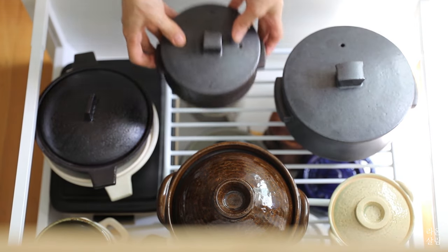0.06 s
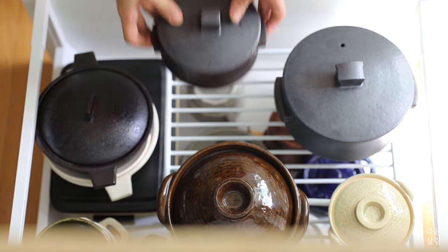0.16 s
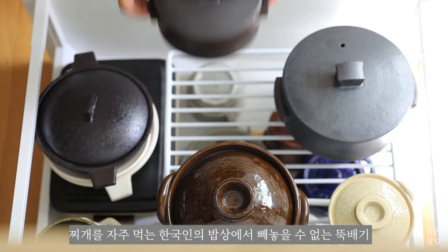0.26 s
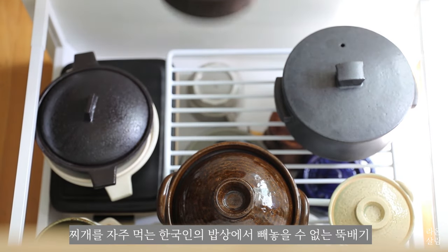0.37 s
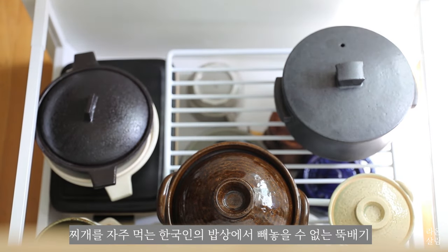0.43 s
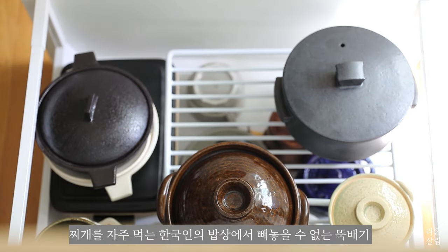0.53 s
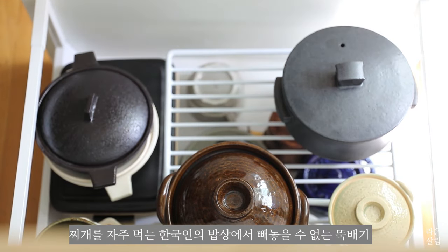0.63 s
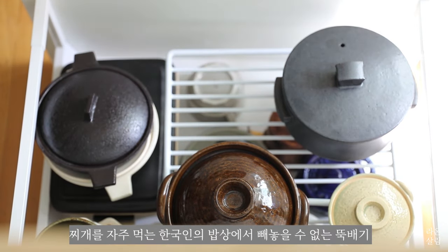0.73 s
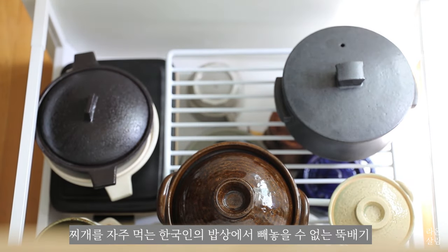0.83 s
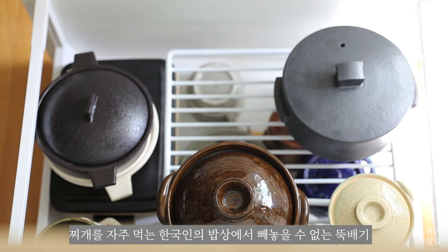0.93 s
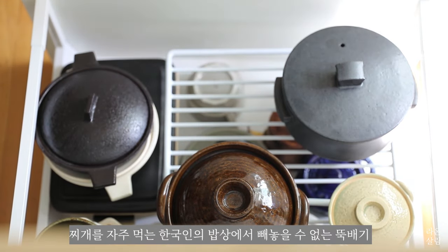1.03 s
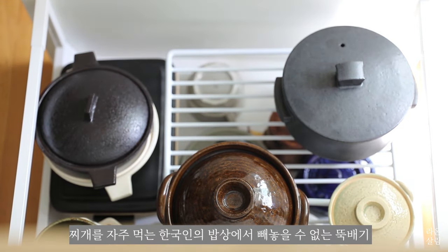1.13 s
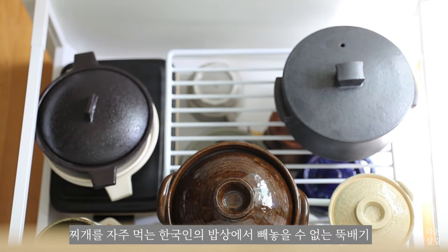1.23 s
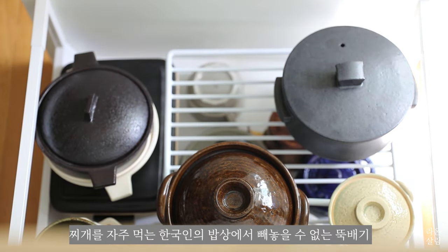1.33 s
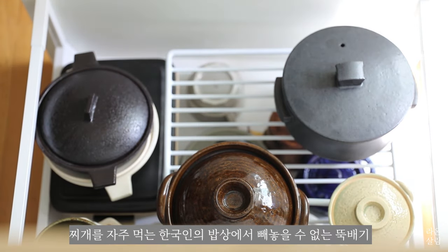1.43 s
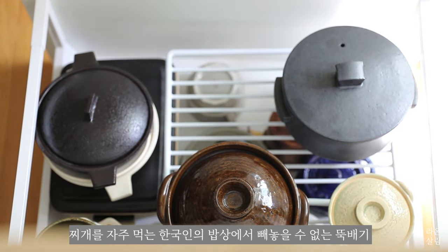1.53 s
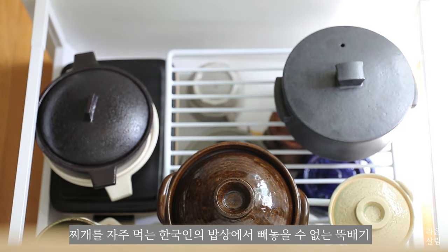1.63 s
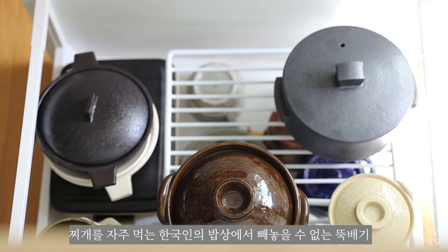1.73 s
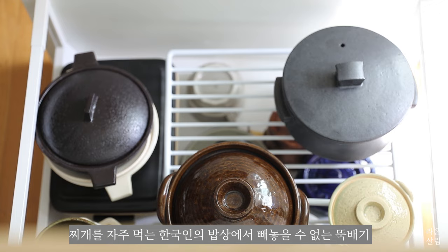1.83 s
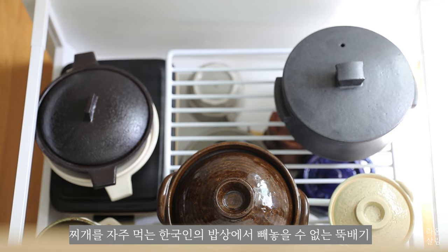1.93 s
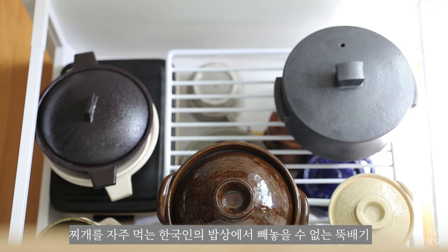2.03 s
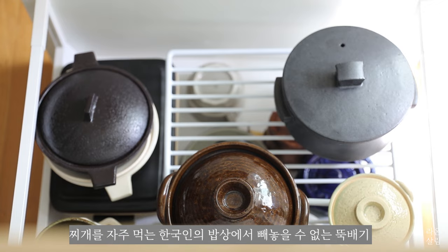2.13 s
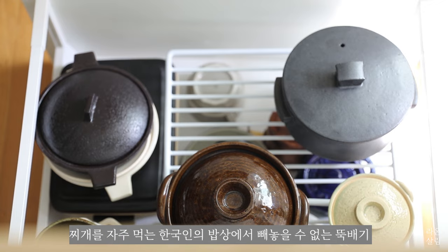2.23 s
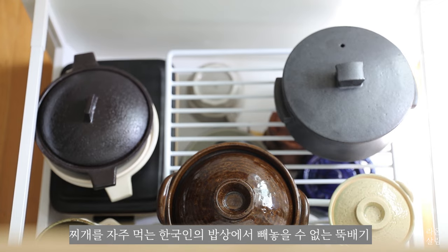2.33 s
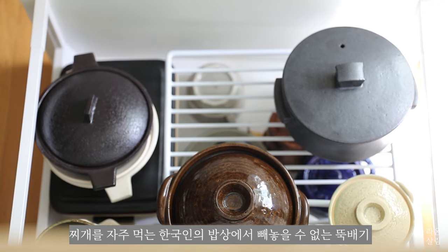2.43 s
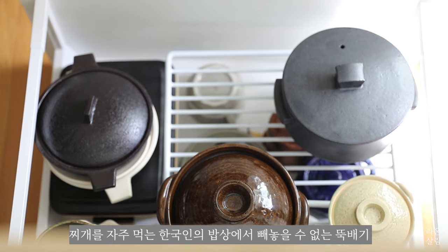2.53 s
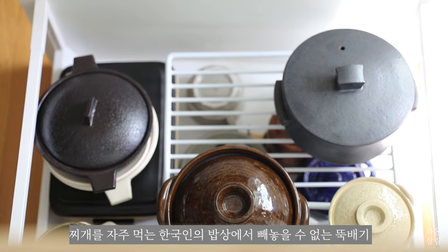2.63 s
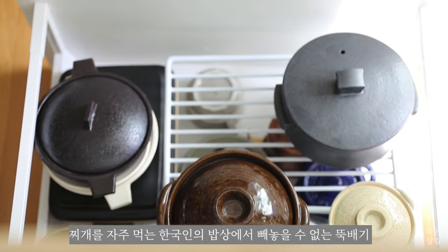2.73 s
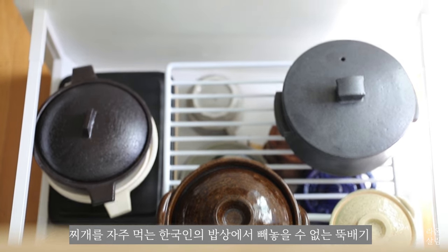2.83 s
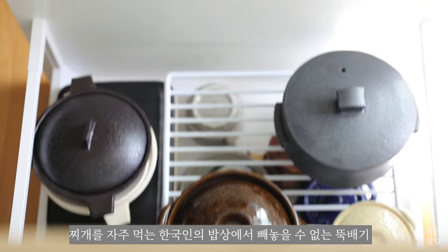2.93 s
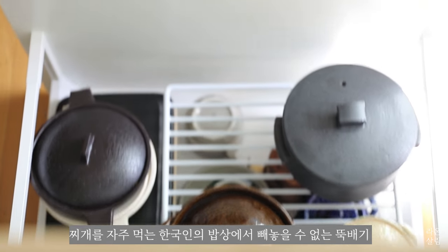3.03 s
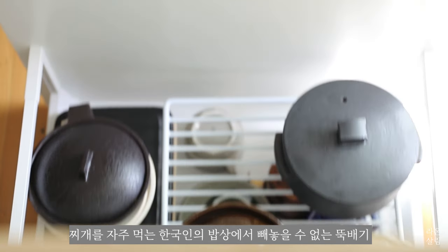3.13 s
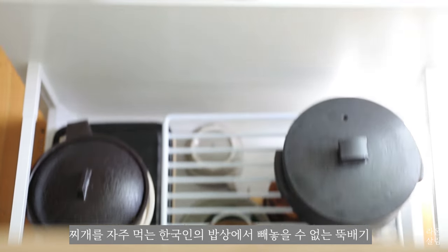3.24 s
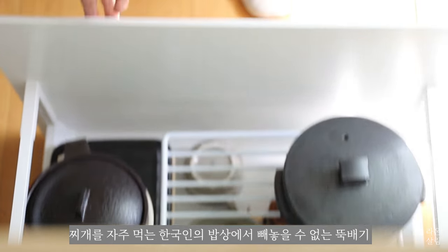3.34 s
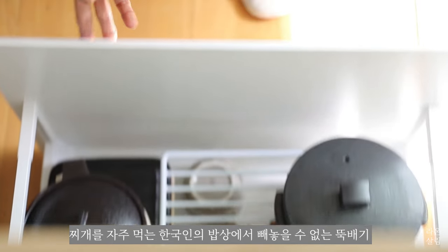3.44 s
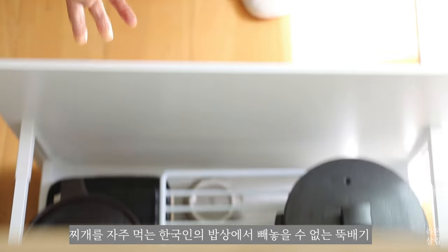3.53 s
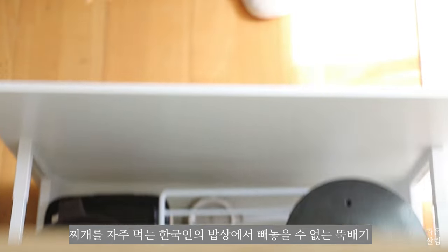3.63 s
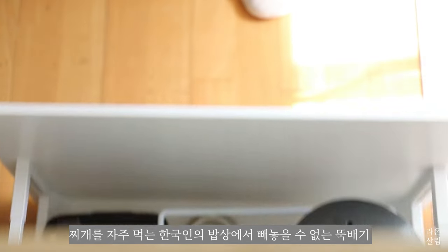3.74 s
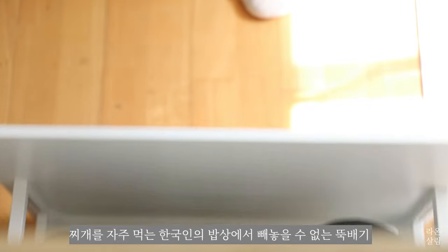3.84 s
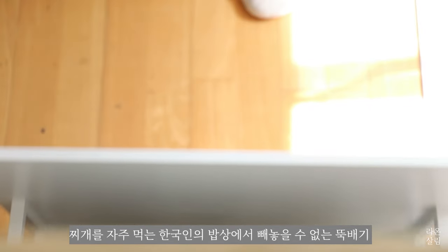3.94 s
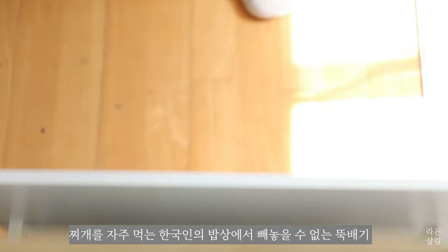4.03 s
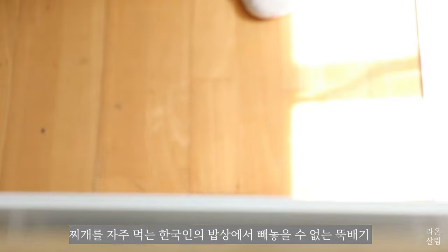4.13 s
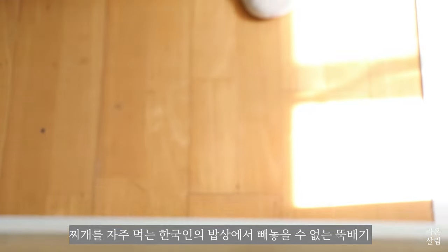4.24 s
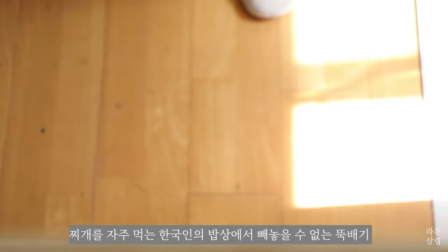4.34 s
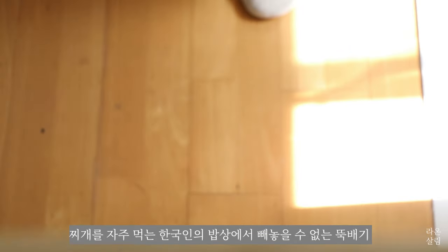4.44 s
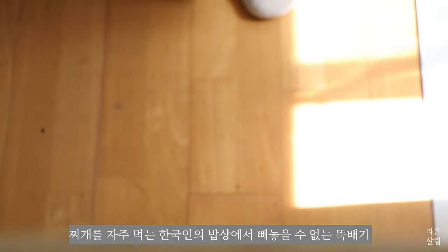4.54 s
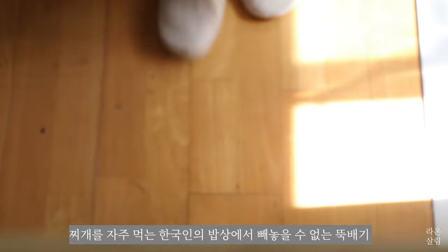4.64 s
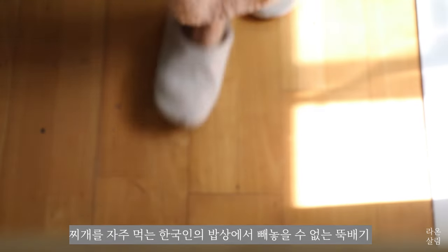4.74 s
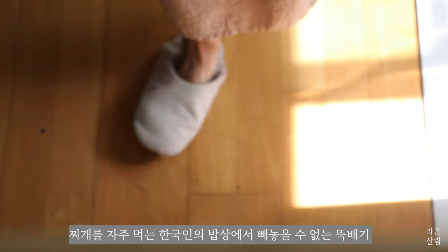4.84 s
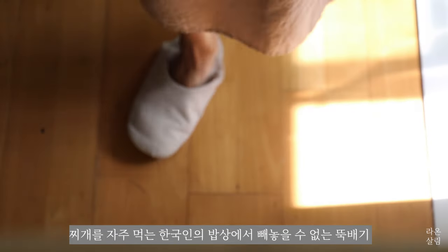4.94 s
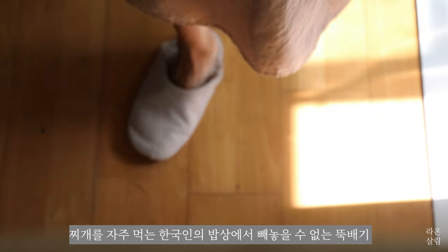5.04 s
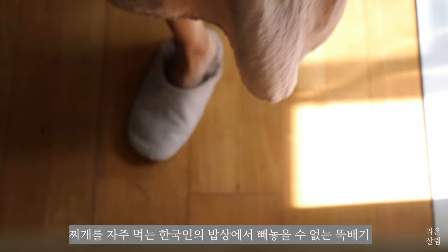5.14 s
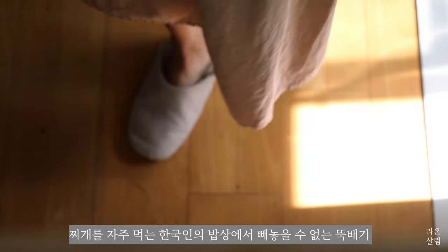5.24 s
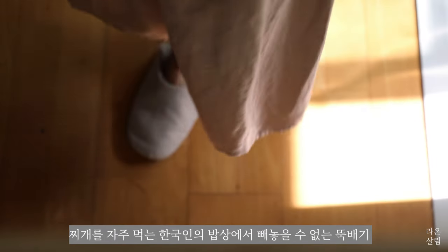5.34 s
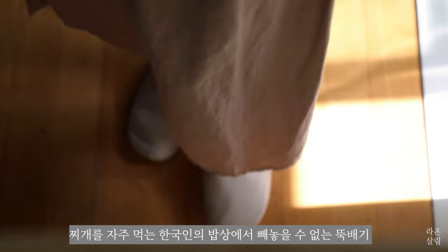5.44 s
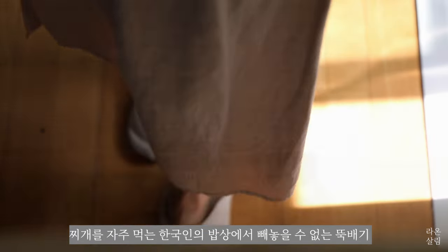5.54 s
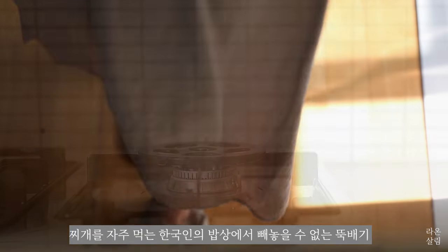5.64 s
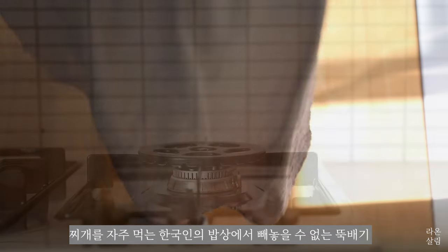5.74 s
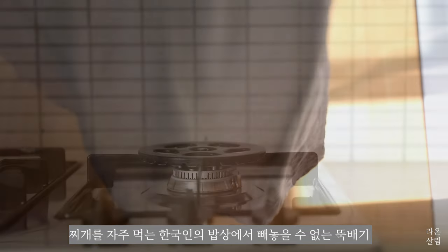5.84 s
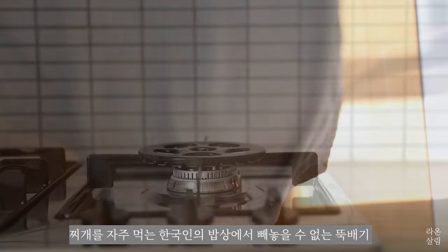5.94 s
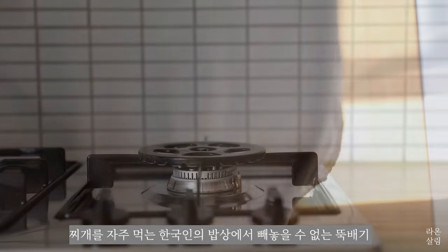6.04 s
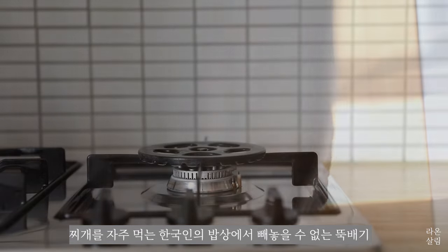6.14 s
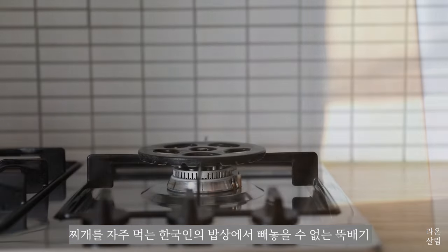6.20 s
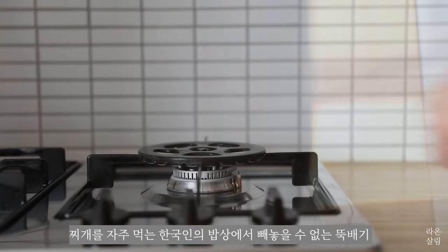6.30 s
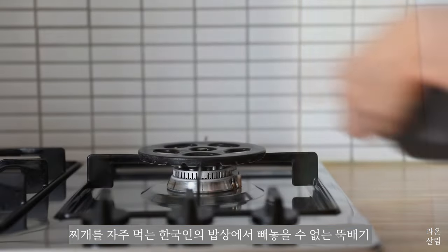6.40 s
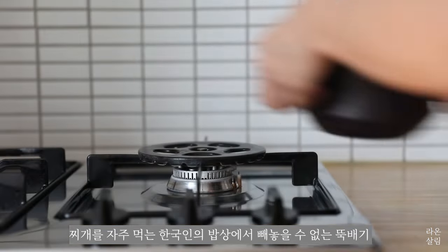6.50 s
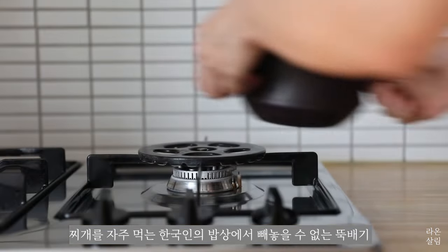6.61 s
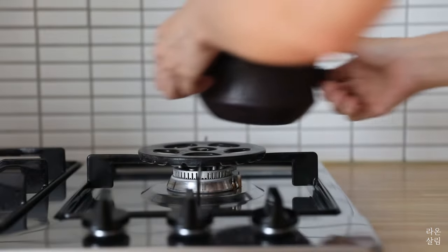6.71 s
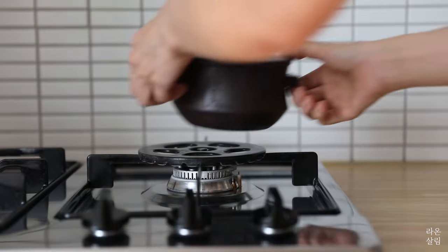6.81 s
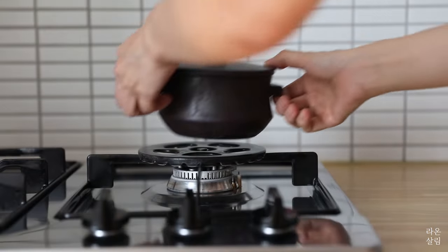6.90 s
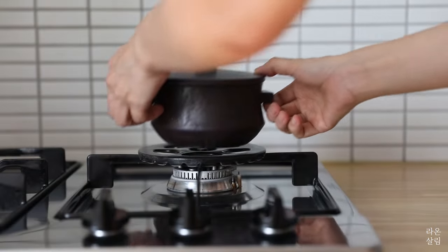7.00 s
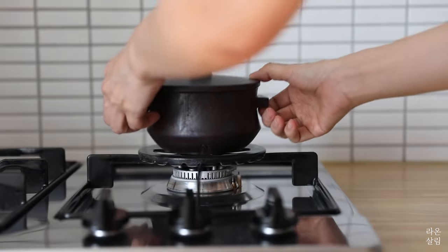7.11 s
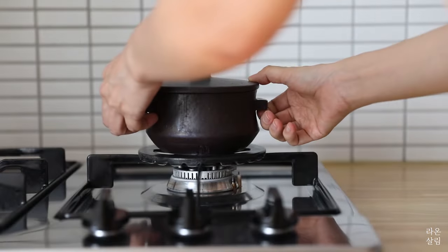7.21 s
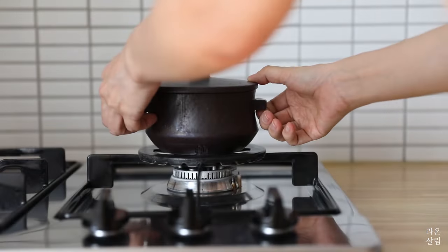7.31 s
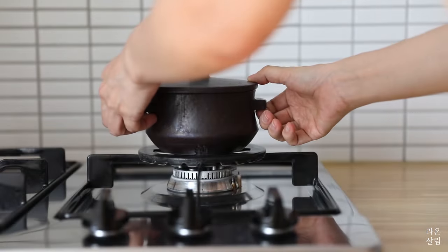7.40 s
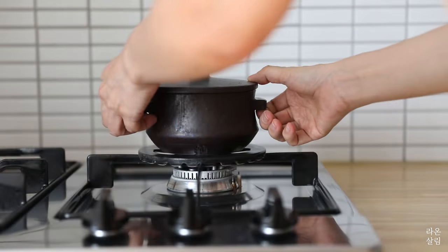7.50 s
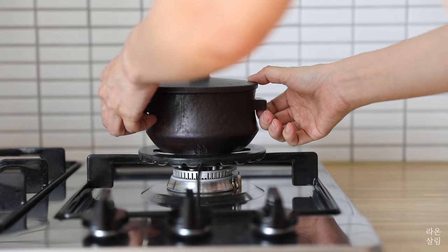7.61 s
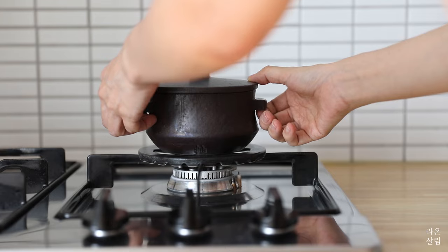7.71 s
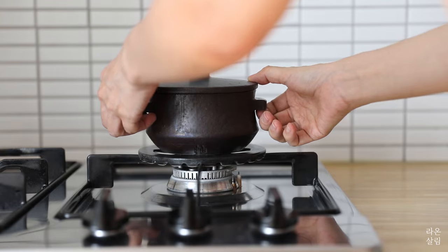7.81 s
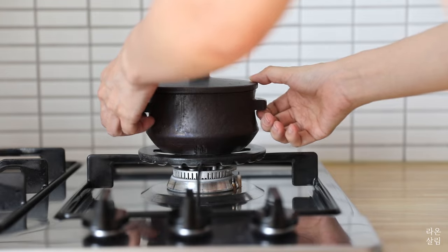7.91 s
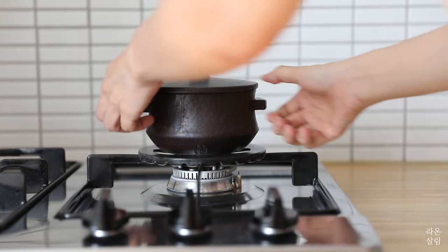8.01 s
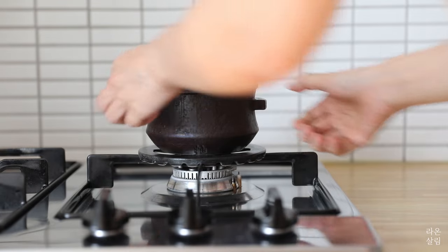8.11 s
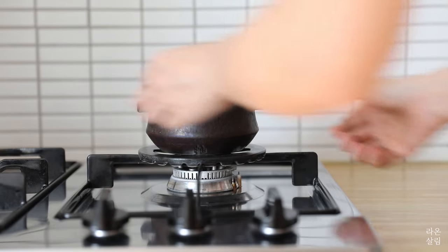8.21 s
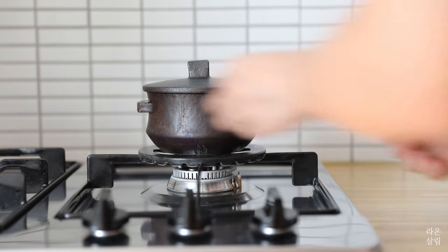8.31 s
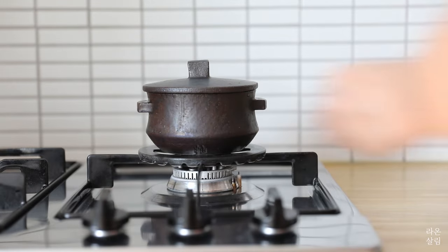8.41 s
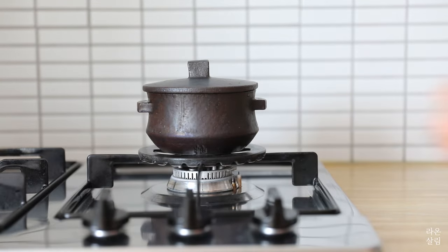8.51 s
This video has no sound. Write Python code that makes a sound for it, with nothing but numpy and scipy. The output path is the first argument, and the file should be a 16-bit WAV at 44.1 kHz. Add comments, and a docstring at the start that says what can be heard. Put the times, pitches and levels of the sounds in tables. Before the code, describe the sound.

Clay pots knock lightly, a kitchen drawer rolls shut and bangs with rattling crockery, then a pot lands hard on an iron stove grate.

```python
"""A deep kitchen drawer rolls shut on its runners and bangs home, its crockery rattling on. Clay pots
knock, a wire rack rocks, slippers scuff the floor; a pot is set down hard on an iron stove grate.
Knocks are short noise bursts that ring modal bodies; rolling and cloth are shaped, wavering noise.
One microphone in a small hard room: every source shares one reverberant tail, so none is set farther
off than the rest. A low hum of the house and the hiss of the recorder lie beneath."""
import sys
import numpy as np
from scipy import signal
from scipy.fft import rfft, irfft, next_fast_len
from scipy.io import wavfile
from scipy.ndimage import uniform_filter1d

SR = 44100
rng = np.random.default_rng(int(sys.argv[2]) if len(sys.argv) > 2 else 0)


def gain_from_db(level_db):
    """Turn a decibel level (scalar or array-like) into a linear amplitude factor."""
    decades = np.asarray(level_db, float) / 20
    return 10 ** decades


def wrap_up_sound(samples):
    """Save the sound to the file named by the first command line argument, as 16-bit audio."""
    columns = np.atleast_2d(samples).T
    # keep every value between -1 and 1, then stretch to whole-number steps
    tamed = np.clip(columns, -1, 1)
    steps = np.round(tamed * 32767).astype(np.int16)
    wavfile.write(sys.argv[1], SR, steps)


N = 377493
T = np.arange(N) / SR

# drawer running on its rollers, then shaking to rest: (time [s], rumble level [dB])
ROLL_LEVELS = [(2.85, -62), (3.0, -45), (3.38, -40), (3.6, -41), (4.02, -42.5), (4.15, -33.5), (4.28, -45),
               (4.77, -28.5), (4.9, -23), (4.96, -30), (5.37, -48.5), (5.86, -55.5), (6.05, -58)]
# colour of the rolling rumble: (frequency [Hz], gain [dB])
RUNNER_COLOUR = [(35, -39), (60, -15), (113, -12.5), (151, 6), (214, -3.5), (445, -3), (926, -9.5),
                 (1060, -14.5), (1750, -28.5), (3710, -38), (6000, -111), (7800, -78), (13200, -120)]
# the drawer jolting and closing in its carcass:
# (time [s], ring peak [dB], loudest ring [Hz], crack over ring peak [dB], chatter [ms])
DRAWER_THUDS = [(3.613, -28, 527, -13, 49), (4.10, -24.5, 300, -6, 43), (4.148, -22.5, 300, -8, 51),
                (4.24, -25, 325, -7, 105), (4.30, -26, 410, -10.5, 18), (4.367, -25, 372, -16, 27),
                (4.435, -32, 600, -34, 42), (4.745, -4.5, 400, -17, 3.1), (4.951, -5, 133, -33, 2),
                (4.966, -10.5, 163, -16, 14), (4.985, -13.5, 100, -23, 7.8), (5.0, -14, 60, -20, 42)]
# modes of the wooden carcass: (frequency [Hz], level [dB], t60 [s])
CABINET_MODES = [(65.8, 1.5, 0.35), (100, -3, 0.064), (146.4, 0, 0.08), (196, 2.5, 0.038),
                 (254, -6.5, 0.11), (315, 0.5, 0.095), (382.3, 0.5, 0.077), (457, 0, 0.06),
                 (570, -8, 0.042), (644, -3.5, 0.05), (910, -6, .05)]
# crockery knocking inside the drawer:
# (time [s], ring peak [dB], loudest ring [Hz], crack over ring peak [dB], chatter [ms])
CROCKERY_CLINKS = [(3.62, -46, 1970, -18, 38), (3.726, -39, 1000, -13, 10), (4.113, -36, 2480, 6, 16),
                   (4.145, -37.5, 3670, -9, 59), (4.24, -40, 3150, -3, 15), (4.58, -35, 2400, 7, 6.8),
                   (4.689, -37, 2650, -11, 7.2), (4.726, -18, 736, -9, 16), (4.746, -10.5, 835, -29, 6.8),
                   (4.765, -10, 900, -8, 28), (4.785, -20, 1970, -1.5, 16), (4.848, -10.5, 900, -15, 6.5),
                   (4.861, -15.5, 2940, -6, 6.8), (4.91, -28, 800, -8, 11), (4.988, -15.5, 1000, -17, 26.4),
                   (5.12, -27, 1000, -11, 5.7), (5.218, -33.5, 3800, -9, 2.1), (5.245, -29, 980, -7, 11),
                   (5.525, -42, 1410, 4.5, 4), (5.653, -38.5, 1370, 4.5, 6.8), (5.826, -45, 1570, 8.5, 5.5)]
# loose crockery jostling after jolts: (start [s], length [s], middle level [dB], lowest ring [Hz])
CROCKERY_RATTLES = [(4.795, .05, -27, 1180), (4.868, .06, -29, 1900), (4.987, .06, -33.5, 1300)]
# modes of a clay pot: (frequency [Hz], level [dB], t60 [s])
POT_MODES = [(600, 3.5, 0.042), (721, 3.5, 0.046), (833, 2, 0.061), (1060, -6.5, 0.034), (1370, -9, 0.044),
             (1620, -0.5, 0.024), (1970, -2, 0.064), (2673, -6, 0.052), (2860, -8, 0.061),
             (3043, 3.5, 0.036), (3464, 4, 0.037), (3800, -4, 0.12), (4310, -8, 0.12), (6280, -11, 0.067)]
# thin glass cups touching: (time [s], ring peak [dB], loudest ring [Hz])
CUP_PINGS = [(4.13, -40, 5250), (4.25, -51, 6750), (4.996, -41, 4950), (5.003, -38, 6840),
             (5.05, -47, 3865), (6.26, -49, 1030), (6.41, -42, 1350)]
# modes of the cups: (frequency [Hz], level [dB], t60 [s])
CUP_MODES = [(1030, 5, .06), (1720, 4, .06), (3480, -6, 0.11), (3865, 5, 0.22), (4580, -6.5, .1),
             (5280, -4, .12), (6900, -9, 0.079), (10800, 3, .1)]

# pot landing and rocking on the grate:
# (time [s], level before tilt [dB], tilt about 1 kHz [dB per octave], chatter [ms])
GRATE_LANDINGS = [(7.261, -3.5, 0.5, 4), (7.281, -9.5, 1.5, 5.7), (7.296, -17.5, -3.5, 3.7),
                  (7.345, -11.5, 1, 10.7), (7.42, -26.5, -3, 22), (7.465, -28, -5, 28)]
# where every contact sets the iron ringing: (frequency [Hz], level [dB], lag [ms])
CONTACT_PARTS = [(115, -13, 6), (880, -2.5, 0.49), (1820, -2.5, 3), (3570, -4, 3), (5600, -2, 2.5),
                 (8600, -7, 0.61)]
# the stove top shuddering on: (frequency [Hz], ring peak [dB], length [ms])
STOVE_SHUDDER = [(130, -23.5, 210), (300, -21.5, 173), (600, -18, 185), (1350, -18.5, 180),
                 (2800, -15.5, 154), (7500, -26, 88)]
# modes of the iron grate: (frequency [Hz], level [dB], t60 [s])
GRATE_MODES = [(112, -2, 0.12), (224, -8.5, 0.16), (300, -5, 0.14), (420, -5, 0.055), (645, -7.5, 0.079),
               (900, 7, 0.055), (1265, -0.5, 0.054), (1737, -5, 0.02), (1953, -4, 0.026),
               (2710, -2.5, 0.038), (2930, -6, 0.15), (3470, 2, 0.066), (3734, 11.5, 0.037),
               (4180, -12.5, 0.055), (4840, -5, 0.031), (4840, -9.5, 0.067), (5500, -6, 0.044),
               (6365, -5.5, 0.036), (6270, -4.5, 0.03), (7350, 3, 0.078), (8390, 6.5, 0.052),
               (9335, -19, 0.0614), (10350, -0.5, .08), (11100, -3, 0.08), (12750, -11.5, .05),
               (13300, -12, .07), (14500, -4, .07), (14760, -7.5, .05)]

# a pot and its lid knocking as they are handled:
# (time [s], ring peak [dB], loudest ring [Hz], crack over ring peak [dB], chatter [ms])
POT_TAPS = [(.978, -43, 870, -1, 18), (1.0755, -16, 880, -5.5, 0.98), (1.456, -32.5, 1050, -8.5, 47),
            (1.995, -41, 2600, -4, 5.4), (2.04, -33.5, 786, 1.5, 12), (2.065, -26.5, 540, -4.5, 22),
            (2.342, -45.5, 2570, 2, 5), (2.386, -26.5, 617, -10, 26), (6.93, -43.5, 2080, 6.5, 4.5)]
# modes of the lid: (frequency [Hz], level [dB], t60 [s])
LID_MODES = [(540, 1, .035), (643, 2, 0.03), (880, -6, 0.037), (944, -3, 0.043), (1126, -15.5, 0.033),
             (1456, -10, 0.043), (1820, 0.5, 0.0364), (1960, -11, 0.073), (2500, -11.5, 0.037),
             (3000, -27, .03), (3700, 10, 0.099), (4000, -19, .04)]
# modes of the wire rack: (frequency [Hz], level [dB], t60 [s])
RACK_MODES = [(150, 9, .14), (460, 0, .14)]
# boards of counter and floor taking weight:
# (time [s], ring peak [dB], loudest ring [Hz], crack over ring peak [dB], chatter [ms])
BOARD_STEPS = [(1.458, -26, 260, -28, 72), (2.045, -31.5, 226, -20, 76), (2.342, -36.5, 250, -14, 16),
               (2.387, -23.5, 278, -2.5, 15.4), (5.25, -30.5, 70, -32, 52), (5.53, -37.5, 70, -25, 140),
               (6.073, -26.5, 315, -9, 32), (6.186, -34, 300, -8.5, 12), (6.305, -37.5, 300, -12, 26),
               (8.42, -42, 75.5, -32, 82)]
# modes of the boards: (frequency [Hz], level [dB], t60 [s])
BOARD_MODES = [(70, 6.5, 0.056), (150.3, -6.5, 0.086), (250, -8, 0.062), (300, -0.5, 0.045),
               (412, -15, 0.04)]
# soles and cloth brushing: (middle [s], rms before the fade [dB], length [ms], centre [Hz])
SOLE_SCUFFS = [(2.17, -56, 160, 3420), (4.14, -54, 90, 5600), (4.56, -49.5, 71, 5600),
               (4.70, -47.5, 21, 6340), (4.78, -45.5, 57, 8540), (5.22, -48.5, 27, 4500),
               (5.299, -41, 72, 3870), (6.091, -57, 130, 4000), (8.227, -53, 79, 3000)]
# sleeves and skirt moving: (time [s], level before flutter [dB])
CLOTH_RUSTLE = [(0.0, -69.5), (0.49, -59.5), (0.97, -61.5), (1.17, -68), (2.41, -65.5), (2.65, -75.5),
                (3.19, -66.5), (3.55, -62.5), (3.8, -79), (4.12, -54.5), (4.28, -61), (4.6, -57),
                (5.4, -66), (5.7, -56.5), (5.96, -62.5), (6.83, -63), (7.2, -74.5), (7.8, -78.5),
                (8.56, -57.5)]
# colour of the house hum and hiss: (frequency [Hz], gain [dB])
HOUSE_COLOUR = [(15, -66), (25, -31), (69, 0), (178, -6), (209, -6.5), (253, -6), (322, -1), (445, -7),
                (482, -9.5), (567, -6), (703, -12), (848, -13), (1240, -17.5), (3720, -29.5), (15500, -31)]
# decay of the room: (frequency [Hz], t60 [s])
ROOM_DECAY = [(100, 0.58), (400, 0.33), (1500, 0.24), (5000, 0.15), (12000, 0.34)]


def drawer_rolling():
    """Rollers cross a dense run of uneven bumps; the carcass and the crockery answer."""
    unevenness_db = 2.0 * (rng.exponential(size=N) + walk(30))
    bumps = rng.standard_normal(N) * gain_from_db(unevenness_db)
    carcass = signal.fftconvolve(bumps, ring(CABINET_MODES, -9, 0.05, 1000))[:N]
    crockery = signal.fftconvolve(bumps, ring(POT_MODES, -31, 0.058, 5400))[:N]
    rumble = level(colour(bumps, RUNNER_COLOUR), 0) + level(carcass, -13.0)
    bright = lowpass(band(bumps, 1820, 2900), 3140)
    buzz = level(bright, 0) + level(crockery, -7)
    s, db = np.transpose(ROLL_LEVELS)
    moving = gain_from_db(np.interp(T, s, db, left=-120, right=-120))
    buzz_db = -10  # against the rumble
    return moving * (level(rumble, 0) + level(buzz, buzz_db))


def drawer_thuds():
    """Jolts and the final bang set the wooden carcass ringing."""
    return blows(DRAWER_THUDS, ring(CABINET_MODES, -4, 0.026, 2400), 0.98, 1130, 11.3)


def crockery_rattle(count):
    """Lists a few chance knocks spread over each jostle, at random pitches above its lowest ring."""
    octaves, scatter_db, edge_db, chatter_ms = 0.71, 1, -0.5, 9.4
    knocks = []
    for start, length, db, lowest_hz in CROCKERY_RATTLES:
        for k in range(count):
            when, size, pitch = rng.random(3)
            s = start + length * (k + when) / count
            peak_db = db + scatter_db * (1 - 2 * size)
            knocks.append((s, peak_db, lowest_hz * 2 ** (octaves * pitch), edge_db, chatter_ms))
    return knocks


def drawer_crockery():
    """Clay knocks on clay inside the drawer, each contact ringing the modes of a pot."""
    knocks = CROCKERY_CLINKS + crockery_rattle(count=4)
    return blows(knocks, ring(POT_MODES, -2.1, 0.091, 3800), 0.91, 2430, 17.6)


def glass_cups():
    """Thin glass touches lightly and rings in narrow bands with hardly any crack."""
    edge_db, chatter_ms = -30, 10
    touches = [(*ping, edge_db, chatter_ms) for ping in CUP_PINGS]
    return blows(touches, ring(CUP_MODES, -12.5, 0.035, 8000), 0.39, 4000, 6)


def pot_landing():
    """Lists every contact as parts through the whole iron, each contact with its own spectral tilt."""
    edge_db = -10.5
    contacts = []
    for s, db, tilt_db, chatter_ms in GRATE_LANDINGS:
        for hz, part_db, lag_ms in CONTACT_PARTS:
            peak_db = db + part_db + tilt_db * np.log2(hz / 1000)
            contacts.append((s + lag_ms / 1000, peak_db, hz, edge_db, chatter_ms))
    return contacts


def stove_shudder():
    """Lists long bursts by which the stove top buzzes on after first contact, the top band shortest."""
    lag_s, edge_db = .012, -22.5
    start = GRATE_LANDINGS[0][0] + lag_s
    return [(start, db, hz, edge_db, ms) for hz, db, ms in STOVE_SHUDDER]


def iron_grate():
    """The pot's contacts and the shudder both ring the same iron modes."""
    grate = ring(GRATE_MODES, 3.5, 0.05, 5200)
    contacts = blows(pot_landing(), grate, 1.34, 2200, 12.3)
    return contacts + blows(stove_shudder(), grate, 0.98, 2200, 0)


def pot_and_lid():
    """Handling knocks the pot and lid, ringing the modes of the lid."""
    return blows(POT_TAPS, ring(LID_MODES, 0, 0.069, 8100), 0.63, 2200, 14.4)


def wire_rack():
    """The rack tips once, then rocks evenly and dies away; each rock strikes wires and frame."""
    tip_s, tip_db = 5.214, -29
    rock_s, gap_s, rock_db, fade_db_per_s = 5.351, .054, -29.5, -23
    light_side_db = -4  # one side lands lighter
    edge_db, chatter_ms = -26, 10.6
    k = np.arange(11)
    times = np.append(tip_s, rock_s + gap_s * k)
    peaks = np.append(tip_db, rock_db + fade_db_per_s * gap_s * k + light_side_db * (k % 2))
    strikes = []
    for s, db in zip(times, peaks):
        strikes.append((s, db, 444, edge_db, chatter_ms))  # wires
        strikes.append((s, db - 5.5, 150, edge_db, chatter_ms))  # frame
    return blows(strikes, ring(RACK_MODES, -29, 0.044, 1000), 1.6, 1200, 10)


def boards():
    """Counter and floor boards take weight with dull, low blows."""
    return blows(BOARD_STEPS, ring(BOARD_MODES, -14.5, .05, 1500), 0.84, 1470, 18.3)


def brushing():
    """Short scuffs of gritty noise swell and fade over a faint, fluttering rustle of cloth."""
    s, db = np.transpose(CLOTH_RUSTLE)
    flutter_db = 0.63 * walk(8.9)
    cloth = level(band(rng.standard_normal(N), 3520, 1000), 0)
    out = gain_from_db(np.interp(T, s, db) + flutter_db) * cloth
    grit = rng.standard_normal(N) * gain_from_db(3.2 * walk(140))
    for s, db, ms, hz in SOLE_SCUFFS:
        near = slice(int((s - .2) * SR), int((s + .2) * SR))
        swell = np.exp(-(2000 * (T[near] - s) / ms) ** 2)
        scrape = band(band(grit[near], hz, 0.77 * hz), hz, 2.5 * hz)
        out[near] += swell * level(scrape, db)
    return out


def house():
    """Steady hum and hiss from coloured noise; the low end wavers."""
    steady = colour(rng.standard_normal(N), HOUSE_COLOUR)
    low = band(steady, 150, 500)
    waver = gain_from_db(0.97 * walk(15)) - 1
    return level(steady + waver * low, -50)


def room(x, wet_db):
    """Adds a diffuse noise tail, each region of pitch dying at its own rate."""
    t = T[:SR]
    tail = np.zeros(SR)
    for hz, t60 in ROOM_DECAY:
        region = band(rng.standard_normal(SR), hz, 0.92 * hz) / np.sqrt(hz)
        tail += region * 1000 ** (-t / t60)
    tail = colour(tail, [(20, -23.0), (100, -17.5), (15000, 1)])
    tail *= 1 - np.exp(-t / 0.0021)  # soft onset
    tail /= np.sqrt(np.sum(tail ** 2))
    return x + gain_from_db(wet_db) * signal.fftconvolve(x, tail)[:N]


def blows(events, body, spread, edge_hz, first_db):
    """A first contact and short chatter, strongest round one pitch, set a body ringing.

    spread: bandwidth over pitch; edge_hz: crack centre; first_db: level of the first sample."""
    out, t = np.zeros(N + SR), T[:SR // 2]
    for s, db, hz, edge_db, ms in events:
        push = rng.standard_normal(len(t)) * np.exp(-(1000 * t / max(ms, .1)) ** 2)
        push[0] = gain_from_db(first_db)
        force = band(band(push, hz, spread * hz), hz, spread * hz)
        y = signal.fftconvolve(force, body)
        y = y / np.abs(y).max()
        # the contact itself is heard straight through the air as a dry crack
        crack = band(band(push * np.exp(-t / 0.023), edge_hz, edge_hz), edge_hz, 1.2 * edge_hz)
        y[:len(t)] += gain_from_db(edge_db) * crack / np.abs(crack).max()
        at = int(s * SR)
        out[at:at + len(y)] += gain_from_db(db) * y
    return out[:N]


def ring(modes, dense_db, dense_t60, dense_hz):
    """Response of a body to a click: its clear modes over a quickly dying crowd of others."""
    t = T[:SR // 2]
    clear = np.zeros(len(t))
    for hz, db, t60 in modes:
        clear += gain_from_db(db) * np.sin(2 * np.pi * hz * t) * 1000 ** (-t / t60)
    # the crowd is so dense that no pitch stands out: random phases, even strength
    phase = np.angle(rfft(rng.standard_normal(len(t)) * 1000 ** (-t / dense_t60)))
    crowd = irfft(np.exp(1j * phase), len(t))
    crowd = colour(crowd, [(60, -10), (200, 8), (dense_hz, 0), (3.4 * dense_hz, -25)])
    crowd *= 1000 ** (-t / (2 * dense_t60))
    return level(clear, 0) + level(crowd, dense_db)


def level(x, db):
    """Scale to an rms level."""
    return x * gain_from_db(db) / np.sqrt(np.mean(x ** 2))


def colour(x, points):
    """Shape the spectrum by (frequency [Hz], gain [dB]) points."""
    hz, db = np.transpose(points)
    size = next_fast_len(len(x))
    log_f = np.log(np.arange(size // 2 + 1) * SR / size + 1)
    gain = gain_from_db(np.interp(log_f, np.log(hz), db))
    return irfft(rfft(x, size) * gain, size)[:len(x)]


def band(x, hz, width):
    """Two-pole resonance, width in Hz."""
    b, a = signal.iirpeak(min(hz, .45 * SR), hz / width, SR)
    return signal.lfilter(b, a, x)


def lowpass(x, hz):
    """Steep treble cut."""
    sos = signal.butter(4, min(hz, .45 * SR), fs=SR, output="sos")
    return signal.sosfilt(sos, x)


def walk(rate):
    """Wandering random levels, each held 1 / rate seconds and slewed twice."""
    k = int(SR / rate)
    held = np.repeat(rng.standard_normal(N // k + 1), k)
    slewed = uniform_filter1d(uniform_filter1d(held, k), k)
    return 1.3 * slewed[:N]  # brings the spread near 1


def scene():
    """Everything reaches one microphone; the house hum is added without the room tail."""
    drawer = drawer_rolling() + drawer_thuds() + drawer_crockery() + glass_cups()
    handling = iron_grate() + pot_and_lid() + wire_rack() + boards() + brushing()
    mono = room(drawer + handling, wet_db=-9.5) + house()
    return np.array([mono, mono])


def low_pass(x):
    """Removes everything above the highest recorded frequency."""
    return signal.sosfilt(signal.butter(12, 16650, fs=SR, output="sos"), x)


def record(dry):
    """The microphone drops the deepest bass, peaks are rounded, hiss enters in opposite polarity."""
    bass_cut = signal.butter(2, 45, "high", fs=SR, output="sos")
    heard = signal.sosfilt(bass_cut, dry)
    rounded = np.tanh(.8 * heard) / .8
    hiss = colour(rng.standard_normal(N), [(100, -12), (3000, -11.5), (12000, -11.5)])
    mix = rounded + level(hiss, -62) * np.array([[1], [-1]])
    return low_pass(mix)


dry = scene()
out = record(dry)
wrap_up_sound(out)
```